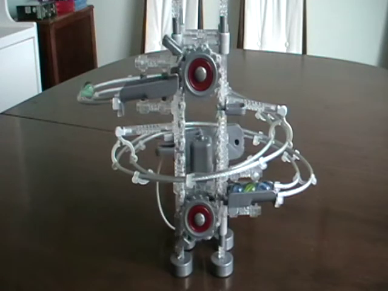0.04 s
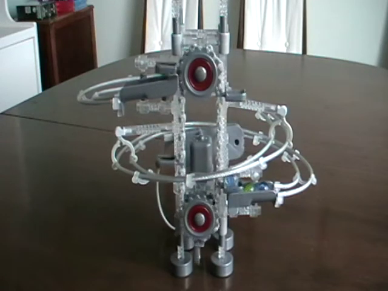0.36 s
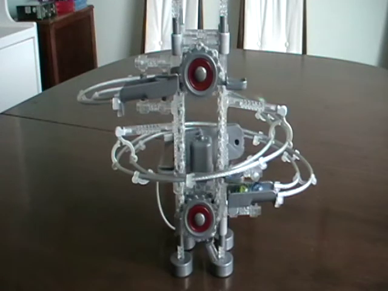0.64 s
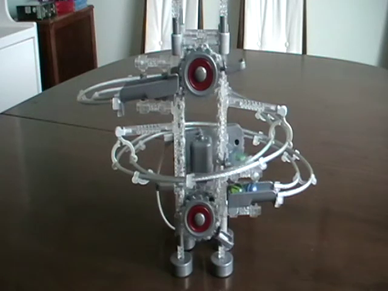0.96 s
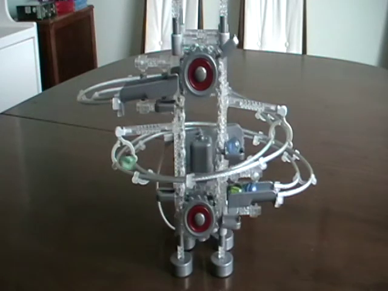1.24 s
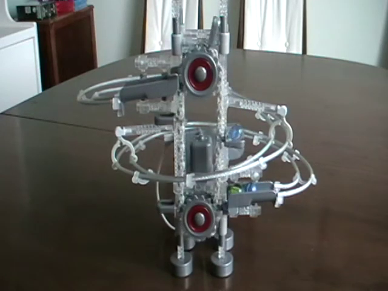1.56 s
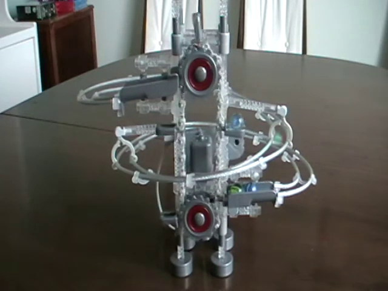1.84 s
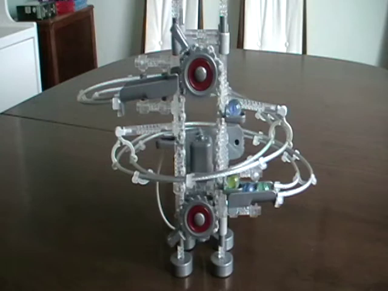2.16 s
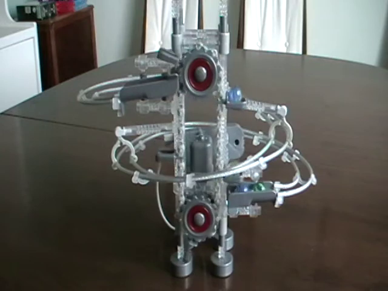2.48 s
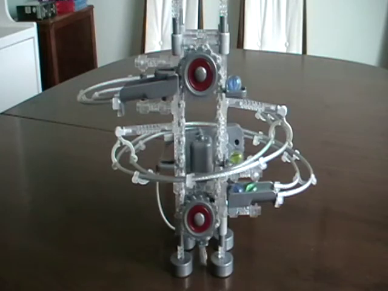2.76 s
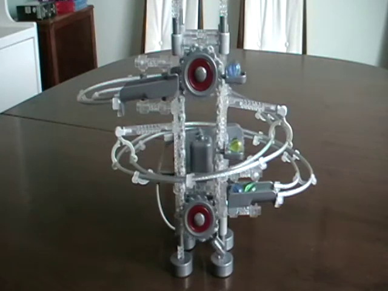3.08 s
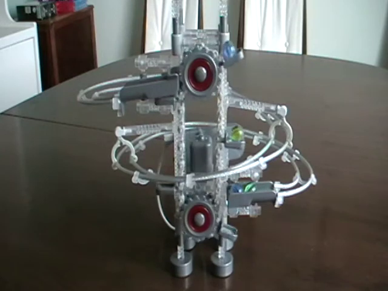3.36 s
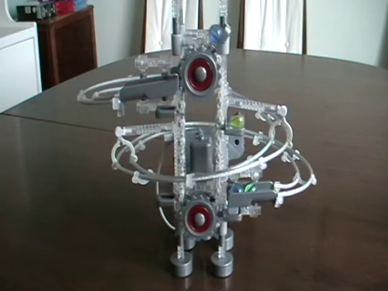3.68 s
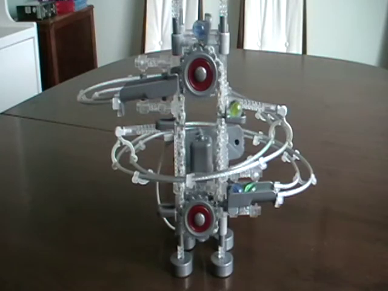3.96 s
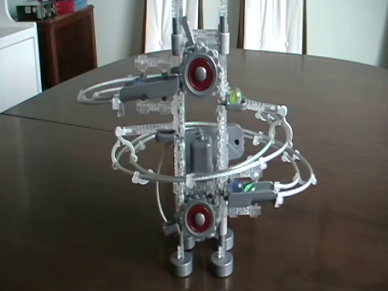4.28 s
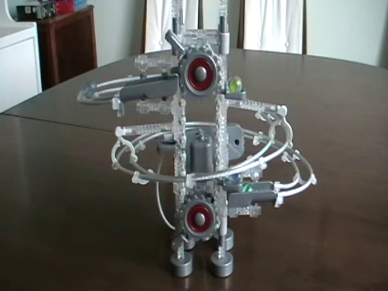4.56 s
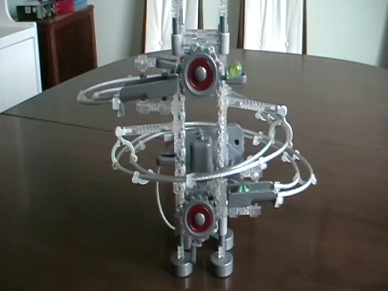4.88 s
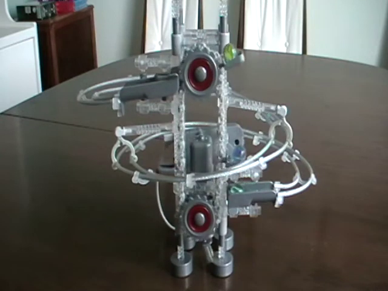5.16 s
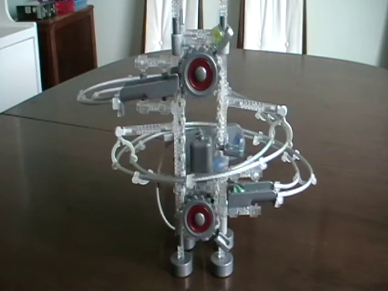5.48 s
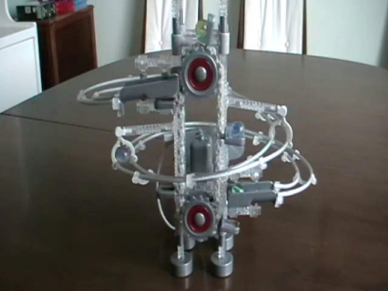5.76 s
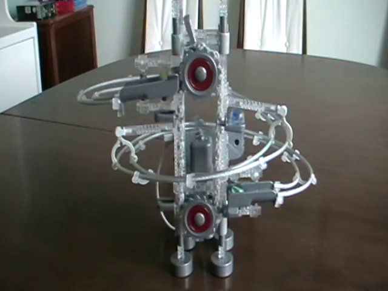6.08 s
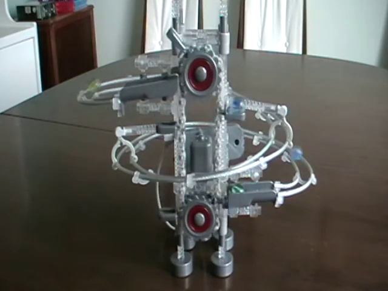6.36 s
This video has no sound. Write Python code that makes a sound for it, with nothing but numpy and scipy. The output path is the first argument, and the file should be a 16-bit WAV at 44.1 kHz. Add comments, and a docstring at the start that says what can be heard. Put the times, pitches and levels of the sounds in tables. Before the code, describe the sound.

A small geared motor whirs and rattles steadily, driving the chain lift of a toy marble run. A marble rumbles down plastic rails and clacks into the waiting marbles about two seconds in, followed by light glassy ticks. Another clatters onto the track around four seconds and rolls down, with more sharp clacks near the end. The microphone is close, in a living room with short echoes and faint hiss.

```python
"""Toy marble run on a living-room table

A close, nearly mono microphone faces the toy on its wooden table. A small geared motor whirs and
drives the chain lift. Each marble drops off the top with a clatter, rumbles down the plastic rails
and clacks into the queue, where glass ticks against glass as the lift takes the marbles.
Behind it are short room echoes, faint hiss and two thin whistles."""
import sys
import numpy as np
from scipy import signal
from scipy.fft import rfft, irfft, next_fast_len
from scipy.io import wavfile
from scipy.ndimage import uniform_filter1d

SR = 44100
rng = np.random.default_rng(int(sys.argv[2]) if len(sys.argv) > 2 else 0)


def wrap_up_sound(samples):
    """Save the sound to the file named by the first command line argument, as 16-bit audio."""
    columns = np.atleast_2d(samples).T
    # keep every value between -1 and 1, then stretch to whole-number steps
    tamed = np.clip(columns, -1, 1)
    steps = np.round(tamed * 32767).astype(np.int16)
    wavfile.write(sys.argv[1], SR, steps)


N = 292383


def amp(db):
    """Decibels to gain."""
    return 10 ** (np.asarray(db) / 20)


def unit_power(x):
    """Scale to unit power."""
    return x / np.sqrt(np.mean(x ** 2) + 1e-20)


def hold_power(x):
    """Hold a narrow ringing near unit power over each fifth of a second."""
    return x / np.sqrt(uniform_filter1d(x ** 2, SR // 5) + 1e-20)


def in_time(points):
    """Read a (t/s, value) curve at every sample."""
    return np.interp(np.arange(N) / SR, *np.transpose(points))


def at_hz(points, hz):
    """Read a (f/Hz, value) curve on a log-frequency axis."""
    f, value = np.transpose(points)
    return np.interp(np.log(np.maximum(hz, 1)), np.log(f), value)


def colour(x, spectrum):
    """Shape a sound by a (f/Hz, gain/dB) curve."""
    hz = np.fft.rfftfreq(len(x), 1 / SR)
    return irfft(rfft(x) * amp(at_hz(spectrum, hz)), len(x))


def noise(spectrum):
    """Steady noise of a given colour, at unit power."""
    return unit_power(colour(rng.standard_normal(next_fast_len(N)), spectrum)[:N])


def drift(per_s):
    """Slow random wander between knots of spread 1."""
    knots = rng.standard_normal(int(per_s * N / SR) + 2)
    return np.interp(np.arange(N) * per_s / SR, np.arange(len(knots)), knots)


def band(x, low_hz, high_hz, order=2):
    """Butterworth band-pass."""
    return signal.sosfilt(signal.butter(order, [low_hz, high_hz], "band", fs=SR, output="sos"), x)


def resonate(x, modes):
    """Parallel resonances (f/Hz, width/Hz, gain/dB) of alternating sign."""
    out = 0
    for k, (hz, width, db) in enumerate(modes):
        r = np.exp(-np.pi * width / SR)
        poles = [1, -2 * r * np.cos(2 * np.pi * hz / SR), r * r]
        out = out + (-1) ** k * amp(db) * signal.lfilter([1, 0, -1], poles, x) * (1 - r * r) / 2
    return out


def add(track, s, sound):
    """Mix a sound in at s seconds."""
    at = min(round(s * SR), N - 1)
    track[at:at + len(sound)] += sound[:N - at]


def contact(touch_s, size=8192):
    """A hard touch: a micro-rattle that dies with time constant touch_s."""
    return rng.standard_normal(size) * (np.exp(-np.arange(size) / SR / touch_s) + 1e-12)


def struck(modes, low_hz, high_hz, touch_s):
    """One blow on a set of modes, with the energy of 20 ms at unit power."""
    ring = band(resonate(contact(touch_s), modes), low_hz, high_hz, order=3)
    return ring / np.sqrt(np.sum(ring ** 2) / (.02 * SR))


# gearbox rattle, close to the microphone: t/s, relative level/dB
RATTLE_LEVEL = [(0.0, -58.5), (0.63, -53), (0.98, -57), (1.29, -52), (1.6, -57.5), (2.75, -56.5),
                (3.05, -59.5), (3.4, -57), (4.06, -57.5), (4.3, -53), (4.73, -56), (4.99, -50.5),
                (5.48, -58), (6.08, -57), (6.3, -54.5), (6.63, -51.5)]
# the motor picks up briefly as a marble goes over the top: t/s, speed/(turns per s)
MOTOR_SPEED = [(0, 157.5), (2.6, 159.5), (2.85, 156.3), (3.3, 156.1), (3.45, 162), (3.68, 164),
               (4.0, 156.5), (4.5, 155.5), (5.7, 158.5), (6.63, 156)]
# resonances of the gearbox and lift tower: f/Hz, width/Hz, gain/dB
TOWER_MODES = [(557, 49, -14.5), (848, 45, -13), (940, 54, -13), (1195, 68, -13), (1496, 105, -8.5),
               (1770, 121, -8.5), (2274, 140, -5), (2372, 190, -2), (2800, 120, 2.5), (2891, 107, 5),
               (3240, 110, -5.5)]
# whine of the teeth: multiple of the motor speed, relative level/dB
GEAR_WHINE = [(1, -90), (3.5, -76.5), (3.96, -81.5), (5.27, -73), (7.04, -75.5), (10.2, -74.5), (14.5, -76),
              (18, -90.5)]


def motor(rattle_db=-1.5, whine_db=-6.0, uneven_db=2.5, slap_s=.0011, jitter_s=.00003, flutter=.00297):
    """Once a turn the gears knock and slap their housing; the teeth whine. Returns rattle and whine."""
    speed = in_time(MOTOR_SPEED)
    turns = np.cumsum(speed * (1 + flutter * drift(per_s=20))) / SR
    turn = turns.astype(int)
    strength = amp(uneven_db * np.clip(rng.standard_normal(N), -2, 1))[turn]
    # backlash makes each knock a little early or late
    since_s = (turns % 1 - .5) / speed - jitter_s * rng.standard_normal(N)[turn]
    knock = .85 * np.maximum(1 - np.abs(since_s) * SR / 2, 0)
    slap = (since_s > 0) * np.exp(-np.abs(since_s) / slap_s)
    shake = strength * knock + (strength * slap + .46) * rng.standard_normal(N)  # .46: steady meshing
    housing = 0
    for hz, width, db in TOWER_MODES:
        ring = resonate(shake, [(hz, 2 * width, 0)])
        housing += resonate(ring, [(hz, 2 * width, db)])  # twice, for steeper skirts
    level_db = in_time(RATTLE_LEVEL) + rattle_db + drift(per_s=24)
    rattle = unit_power(band(housing, 300, 3900, order=3)) * amp(level_db)
    whine = sum(np.sqrt(2) * amp(db + drift(per_s=8.7)) * np.sin(2 * np.pi * multiple * turns)
                for multiple, db in GEAR_WHINE)
    # the teeth sing 6 dB louder from 2.65 to 3.98 s
    t = np.arange(N) / SR
    singing_db = 6 * np.clip(.5 + np.minimum(t - 2.65, 3.98 - t) / .2, 0, 1)
    return rattle, amp(singing_db + whine_db) * whine


def chain(per_s=55.0, link_db=-56.0, spread_db=4.0, link_hz=5400, width_hz=1100, skirt_db=-17.5):
    """The links of the lift chain click very faintly as they ride over the sprockets."""
    onsets = rng.random(N) < per_s / SR
    sizes = amp(link_db + spread_db * np.clip(rng.standard_normal(N), -2, 2))
    touch = contact(touch_s=.0004)
    link = band(resonate(touch, [(link_hz, width_hz, 0)]) + amp(skirt_db) * touch, 4000, 11000)
    return signal.fftconvolve(onsets * sizes, link / np.abs(link).max())[:N]


# a marble leaves the top of the lift: t/s, relative level/dB
MARBLE_RUNS = [(-0.29, 3.5), (4.18, 2.5), (6.052, 0)]
# uneven stretches of track: t/s into the run, extra level/dB
ROUGH_SPOTS = [(0.92, 8), (1.11, 7.5), (1.59, 4.5)]


def roll_levels(run_s=2.48, fastest_s=2.36, drop_s=.091, bump_s=.031):
    """Relative dB of frame rumble, rail hum and scrape: the chain plus every marble on the track."""
    frame, hum, scrape = amp([-64, -79, -62]) ** 2  # the moving chain alone
    for s, db in MARBLE_RUNS:
        age = np.clip(np.arange(N) / SR - s, 0, run_s)
        bump_db = sum(extra * np.exp(-((age - at) / bump_s) ** 2) for at, extra in ROUGH_SPOTS)
        power = (age > 0) * (age < run_s) * amp(db + bump_db) ** 2
        # the marble gathers speed down the spiral, then the last bend brakes it (slopes in dB/s)
        speed_db = np.minimum(10.5 * (age - fastest_s), 76.5 * (fastest_s - age))
        # the frame shakes most at the top and foot, where the rails are fastened to it
        ends_db = np.maximum(-49.5 - 25 * age, -52.5 - 25 * (run_s - age))
        # the drop from the lift sets the rails humming
        drop_db = -49 - 119 * np.abs(age - drop_s)
        frame = frame + power * (amp(ends_db) ** 2 + amp(-69) ** 2)
        hum = hum + power * (amp(-62.5 + speed_db) ** 2 + amp(drop_db) ** 2)
        scrape = scrape + power * amp(-59.5 + .45 * speed_db) ** 2
    return 10 * np.log10([frame, hum, scrape])


# the frame on the table and its rails, under a rolling marble: f/Hz, width/Hz, gain/dB
FRAME_MODES = [(88, 25, -10), (118, 16, -3), (157, 20, -4), (185, 10, 5), (215, 40, -6)]
RAIL_MODES = [(295, 45, -3), (362, 14, -1), (398, 14, 4), (480, 50, -12)]


def rolling(frame_db=-9.0, rails_db=-3.0, scrape_db=-6.0, bumpy_db=3.0):
    """Marbles run over the grain of the rails, which hum and pass the shaking on to the frame."""
    rumble, hum, scrape = roll_levels()
    grain = rng.standard_normal((3, N)) * amp(bumpy_db * drift(per_s=23))
    frame = hold_power(band(resonate(grain[0], FRAME_MODES), 65, 300))
    rails = hold_power(band(resonate(grain[1], RAIL_MODES), 160, 630))
    grit = unit_power(band(resonate(grain[2], TOWER_MODES), 540, 1750, order=3))
    return frame * amp(rumble + frame_db) + rails * amp(hum + rails_db) + grit * amp(scrape + scrape_db)


# the plastic track when knocked: f/Hz, width/Hz, gain/dB
PLASTIC_MODES = [(895, 85, -9), (1167, 81, -7), (1636, 110, 0), (1930, 89, -4.5), (2314, 95, 1.5),
                 (2790, 89, 2.5), (2990, 230, -1), (3640, 380, -2)]


def rail_seams(per_s=28.0, seam_db=-10.0, spread_db=2.0):
    """Marbles bump over seams in the rails: light random knocks that follow the level of the scrape."""
    scrape_db = roll_levels()[2]
    sizes = amp(spread_db * np.clip(rng.standard_normal(N), -2, 2))
    bumps = (rng.random(N) < per_s / SR) * sizes * amp(scrape_db + seam_db)
    return signal.fftconvolve(bumps, struck(PLASTIC_MODES, 650, 3900, touch_s=.0031))[:N]


# thin whistles at the microphone: f/Hz, level/dB
WHISTLE_TONES = [(3895, -84), (15625, -89)]


def whistles():
    """Two faint, steady high tones."""
    t = np.arange(N) / SR
    return sum(np.sqrt(2) * amp(db) * np.sin(2 * np.pi * hz * t) for hz, db in WHISTLE_TONES)


# hiss and living-room air at the microphone: f/Hz, relative density/dB
HISS_SPECTRUM = [(2240, -15), (3800, 1.5), (4230, -12), (4980, -3.5), (6890, -9), (7920, -1.5), (8560, -6),
                 (10700, -6), (11700, -11.5), (13000, -3.5), (13600, -12.5), (14200, -22.5), (16000, -14)]
AIR_SPECTRUM = [(20, -24), (45, -5), (90, 0.5), (200, -2), (400, -3), (1000, -18), (4000, -21)]


def room_tone(hiss_db=-68.5, air_db=-68.5):
    """Faint hiss over the low murmur of still room air."""
    return amp(hiss_db) * noise(HISS_SPECTRUM) + amp(air_db) * noise(AIR_SPECTRUM)


# decay of the living room: f/Hz, t60/s
ROOM_DECAY = [(100, .7), (200, .65), (500, .46), (2500, .43), (7000, .3), (14000, .245)]
# its echoes, heard from close by the toy: f/Hz, gain/dB
ECHO_GAIN = [(100, -0.5), (300, 1), (1000, -1), (2800, -6), (4500, -5), (8000, -7.5), (12000, -13.5),
             (16000, -11.5)]


def room_echo(gap_s=.0062, build_s=.00066, bands=16):
    """Diffuse echoes build up after the direct sound and die faster in the treble."""
    t, out = np.arange(SR) / SR, 0
    edges = np.geomspace(60, 18000, bands + 1)
    onset = 1 - np.exp(-np.maximum(t - gap_s, 0) / build_s)
    for low, high in zip(edges, edges[1:]):
        hz = np.sqrt(low * high)
        decay = amp(-60 * t / at_hz(ROOM_DECAY, hz))
        tail = band(rng.standard_normal(SR), low, high) * onset * decay
        to_unit_gain = np.sqrt(2 * (high - low) / SR / np.sum(tail ** 2))
        out = out + tail * to_unit_gain * amp(at_hz(ECHO_GAIN, hz))
    return out


# light touches between marbles in the queue: t/s, peak level/dB, f/Hz
QUEUE_TICKS = [(0.0166, -31.5, 7700), (0.382, -41.5, 12200), (0.5563, -39, 7560), (0.897, -31.5, 8500),
               (1.7777, -35.5, 7900), (2.2682, -39, 7050), (2.6275, -30, 13500), (2.7105, -26, 8500),
               (2.7655, -39, 12000), (2.8207, -36, 8400), (2.9348, -39, 8450), (4.128, -36, 8570),
               (4.9477, -40.5, 13200), (6.0544, -35.5, 10600), (6.4196, -29, 13300)]


def ticks(width_hz=2600, skirt_db=-33.5, tray_db=-28.0, lag_s=.0004):
    """Glass touching glass gives one bright, very short tick; the tray under it answers faintly."""
    out = np.zeros(N)
    for s, peak_db, hz in QUEUE_TICKS:
        touch = contact(touch_s=.00077)
        tick = band(resonate(touch, [(hz, width_hz, 0)]) + amp(skirt_db) * touch, 6100, 12700)
        tray = amp(tray_db) * struck(PLASTIC_MODES, 650, 3600, touch_s=.003)
        add(out, s + lag_s, amp(peak_db) * (tick / np.abs(tick).max() + tray))
    return out


# marbles landing and bouncing, close up: t/s, relative level/dB, hardness (extra ring)/dB, ring f/Hz
LANDINGS = [(2.0888, -43.5, -9, 9600), (2.1016, -34.5, -1, 11300), (2.1343, -36, 19, 9100),
            (2.1417, -28.5, 2, 10400), (2.36, -50.5, -29, 9800), (4.1811, -47, 4, 8900),
            (4.2346, -29, 14, 13000), (4.2469, -26.5, 0, 8600), (4.2639, -37.5, 25.5, 13300),
            (4.3038, -34.5, 5.5, 10490), (6.1028, -32, 12.5, 11900), (6.1138, -29, 9, 10300),
            (6.1255, -38.5, 15, 12700), (6.1551, -36, -0.5, 10300), (6.5505, -37.5, -5, 7970),
            (6.5812, -39, 5, 10800), (6.6052, -26.5, 1.5, 11300), (6.6274, -32, 7, 10100)]
# colour of the first crack: f/Hz, gain/dB
CRACK_SPECTRUM = [(300, -23), (1400, -9.5), (3400, 5.5), (4500, -9), (7500, -3), (16000, -0.5)]
# the frame's thud, then the lower and upper ring of the glass: f/Hz, width/Hz, gain/dB
THUD_MODES = [(125, 19, 0.5), (190.5, 17, 5), (301, 50, -5), (397, 30, -1), (580, 180, -7.5)]
GLASS_LOW_MODES = [(5400, 296, -11), (6850, 610, 6.5), (7860, 360, 5.5), (9200, 870, -0.5)]
GLASS_HIGH_MODES = [(11230, 240, 5.5), (12170, 600, 4), (13410, 520, 0), (15330, 1100, -18.5)]


def clacks(crack_db=16.0, thud_db=-31.0, knock_db=-5.0, glass_db=-8.5, focus_db=32.5, lag_s=.0005):
    """A landing marble cracks, thumps the frame and knocks the plastic; harder contacts ring more."""
    out = np.zeros(N)
    for s, db, hardness_db, ring_hz in LANDINGS:
        crack = band(colour(contact(touch_s=.00067), CRACK_SPECTRUM), 300, 18000)
        fade = np.hanning(2 * len(crack))[len(crack):]
        # glass modes an octave from the pitch of the contact lose focus_db
        glass = [(hz, width, gain - focus_db * np.log2(hz / ring_hz) ** 2)
                 for hz, width, gain in GLASS_LOW_MODES + GLASS_HIGH_MODES]
        blow = amp(db + crack_db) * fade * crack / np.abs(crack).max()
        # the thud grows more slowly than the blow
        blow += amp(.63 * db + thud_db) * struck(THUD_MODES, 41, 870, touch_s=.002)
        blow += amp(db + knock_db) * struck(PLASTIC_MODES, 663, 3400, touch_s=.0036)
        blow += amp(db + hardness_db + glass_db) * struck(glass, 5400, 16000, touch_s=.0017)
        add(out, s + lag_s, chatter(blow))
    return out


def chatter(blow, spread_s=.016, chatter_db=-14.5, count=4):
    """A blow jostles loose parts, which touch again a few times, ever more weakly."""
    out = np.zeros(N)
    add(out, 0, blow)
    for late, sign in zip(rng.uniform(.076, 1.7, count), rng.choice([-1, 1], count)):
        add(out, late * spread_s, sign * amp(chatter_db) * np.exp(-late / 2) * blow)
    return out[:2 * len(blow)]


# a thin, loose plastic flap on the toy: f/Hz, width/Hz, gain/dB
FLAP_MODES = [(1830, 80, 0), (2100, 120, -4)]


def flap(at_s=4.3045, level_db=-36):
    """The flap claps back once after a heavy landing and rings briefly on a clear note."""
    out = np.zeros(N)
    add(out, at_s, amp(level_db) * struck(FLAP_MODES, 930, 4000, touch_s=.00021))
    return out


# echoes and room tone that differ between the microphone's two ports: f/Hz, gain/dB
SIDE_GAIN = [(60, -10), (250, -11.5), (500, -4), (1100, -8), (2800, -20.5), (4500, 2.5), (6500, -1.5),
             (9000, -8.5), (14000, -4.5)]
# further hiss that differs between them: f/Hz, relative density/dB
SIDE_HISS_SPECTRUM = [(2060, -29.5), (3500, 5.5), (4510, -4), (5860, -13.5), (7750, -11), (8690, -19.5),
                      (15100, -18), (16000, -16.5)]


def scene(left_db=.31, side_hiss_db=-75.0):
    """The toy stands close, almost dead ahead; echoes, room tone and hiss give the slight width."""
    rattle, whine = motor()
    toy = rattle + chain() + rolling() + rail_seams() + clacks() + flap() + ticks()
    mid_echo, side_echo = [signal.fftconvolve(toy, room_echo())[:N] for _ in range(2)]
    # the faint tones reach the microphone by their direct path only
    mid = toy + mid_echo + whine + whistles() + room_tone()
    side = colour(side_echo + room_tone(), SIDE_GAIN) + amp(side_hiss_db) * noise(SIDE_HISS_SPECTRUM)
    return np.array([mid * amp(left_db) + side, mid * amp(-left_db) - side])


def record(dry):
    """The recorder cuts the top steeply above 16 kHz."""
    return signal.sosfilt(signal.ellip(10, .2, 80, 16000, fs=SR, output="sos"), dry)


dry = scene()
out = record(dry)
wrap_up_sound(out)
```